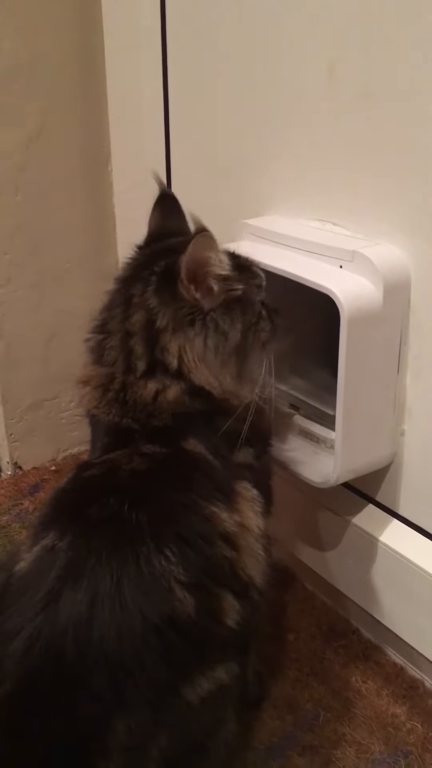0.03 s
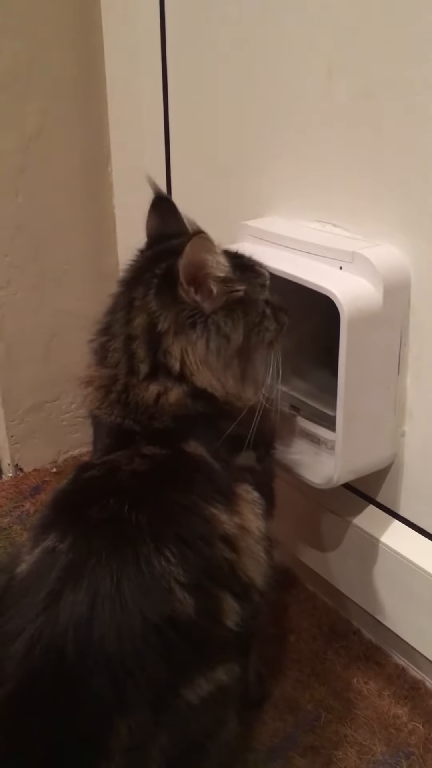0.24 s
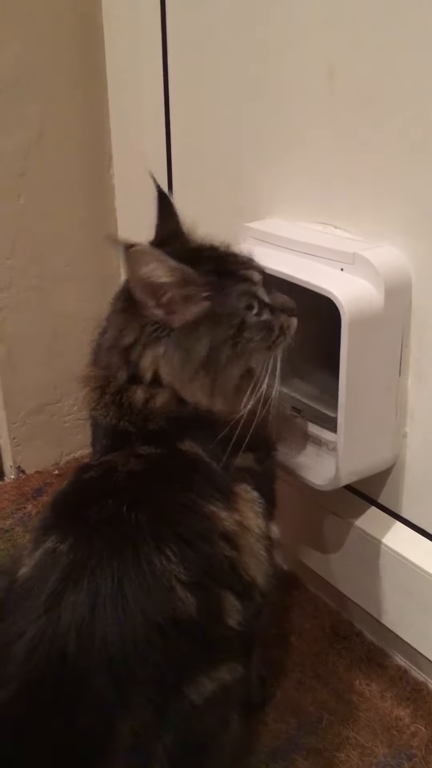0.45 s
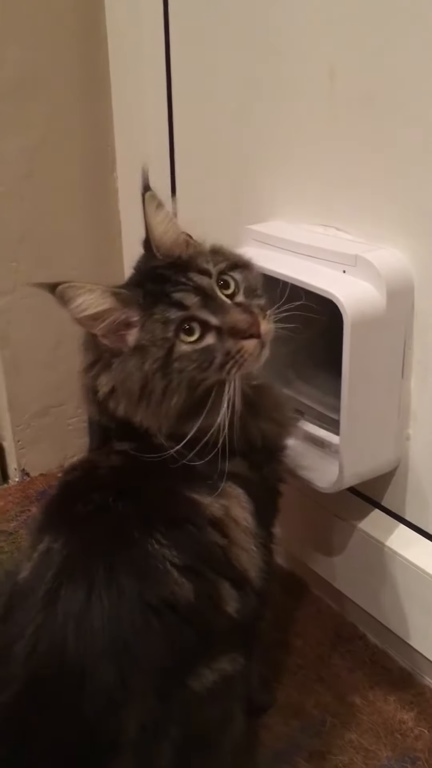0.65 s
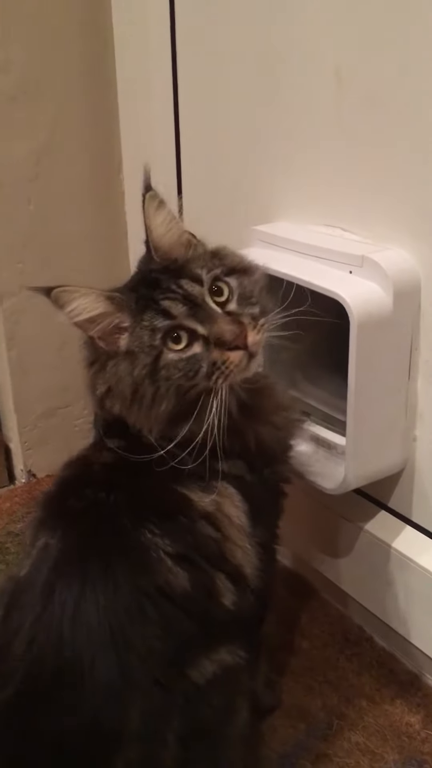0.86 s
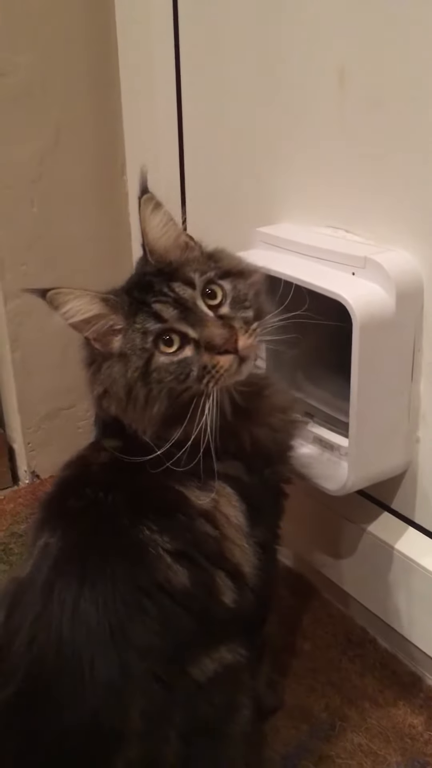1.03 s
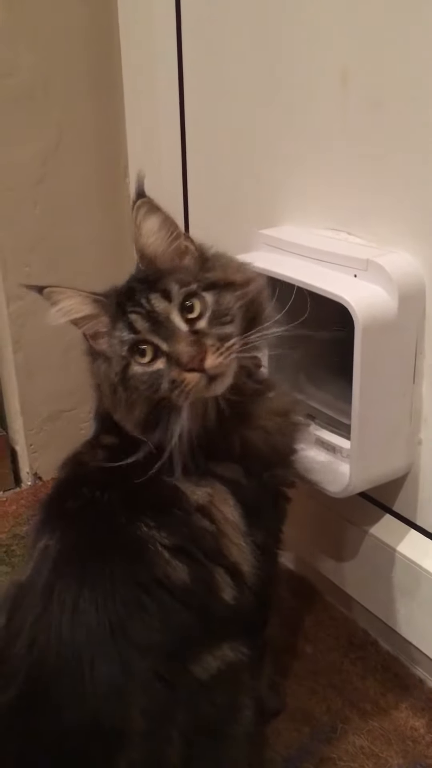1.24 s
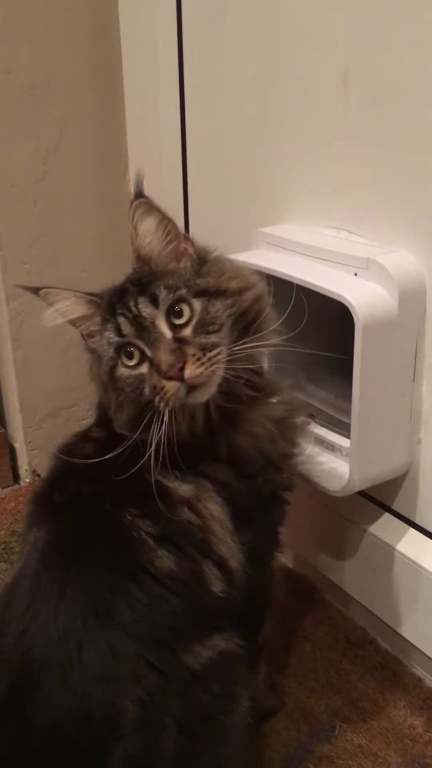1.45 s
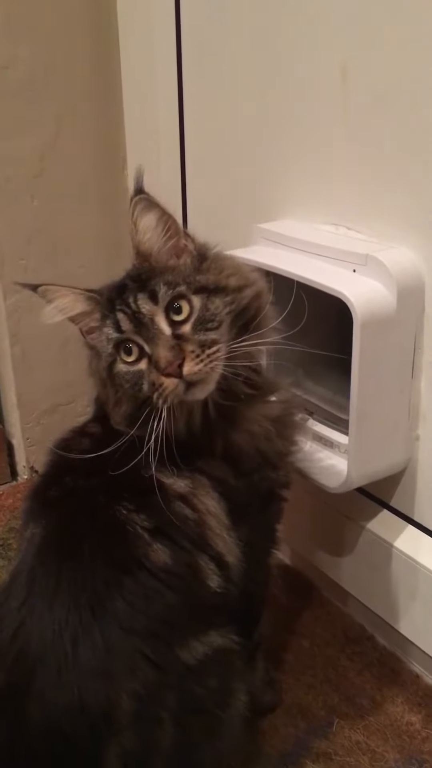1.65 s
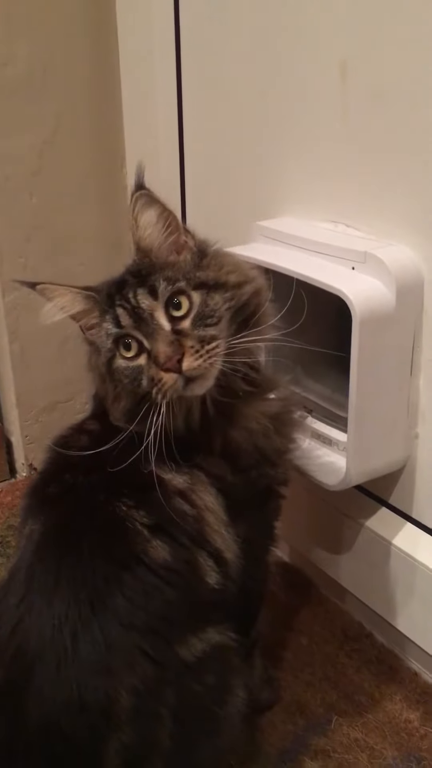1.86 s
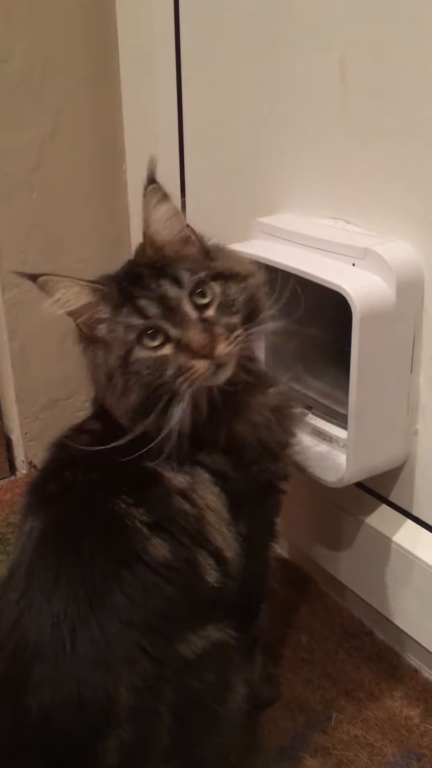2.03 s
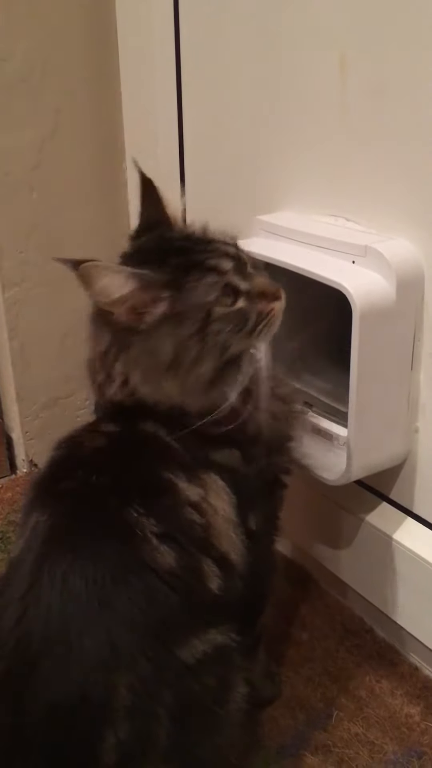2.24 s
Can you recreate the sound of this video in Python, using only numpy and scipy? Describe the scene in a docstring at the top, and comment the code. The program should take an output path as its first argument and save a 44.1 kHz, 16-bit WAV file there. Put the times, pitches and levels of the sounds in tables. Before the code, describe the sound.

A plastic cat flap ticks faintly, then clacks loudly against its frame at 0.2 seconds with a low thud from the door, rattling on until 0.7 seconds. In the lull, fur rubs very softly on the frame. From 1.6 seconds the flap ticks and rattles again, knocks at 2.1 seconds and taps lightly near 2.4. Each knock rings briefly in the small, quiet room.

```python
"""A small quiet room, one microphone near a door where a cat nudges a plastic cat flap.
After a few faint ticks the flap slams against its frame at 0.2 s, shaking the door panel, and rattles
until 0.7 s. In the lull fur rubs softly on the frame. From 1.6 s the flap ticks and rattles again,
knocks at 2.1 s and taps once more. Each knock is a quick chatter of plastic edges that rings the
housing; the room answers briefly."""
import sys
import numpy as np
from scipy import signal
from scipy.fft import rfft, irfft
from scipy.io import wavfile
from scipy.ndimage import uniform_filter1d

SR = 44100
rng = np.random.default_rng(int(sys.argv[2]) if len(sys.argv) > 2 else 0)


def dump_mix(stems):
    """Bounce the given channels to the path in sys.argv[1] as a 16-bit WAV at rate SR."""
    frames = np.atleast_2d(stems).T  # one column per channel
    limited = np.clip(frames, -1, 1)  # hard clip at full scale
    pcm = np.round(limited * 32767).astype(np.int16)
    wavfile.write(sys.argv[1], SR, pcm)


N = 105840  # 2.4 s

# spectra of room tone, rubbing fur and the fine rustle of whiskers and coat: f/Hz, relative level/dB
ROOM_TONE_SPECTRUM = [(20, -29), (45, 0), (70, -2.5), (110, 4), (170, -10), (320, -10), (480, -18.5),
                      (800, -17), (1400, -21), (2500, -32), (5000, -32), (9000, -33.5), (11000, -36.5),
                      (15800, -38.5)]
FUR_SPECTRUM = [(100, -5), (350, -4.5), (900, -2.5), (1800, -9), (3200, -16), (9000, -39), (16000, -53)]
RUSTLE_SPECTRUM = [(500, -6), (2000, 11.5), (4000, 7.5), (8000, 2.5), (16000, -17)]
# swells of rubbing and of rustle: t/s, half length/s, level/dB
FUR_SWELLS = [(0.001, 0.018, -62.5), (0.14, 0.052, -65), (0.52, 0.11, -63), (1.025, 0.08, -64),
              (1.202, 0.019, -65)]
RUSTLE_SWELLS = [(1.479, 0.048, -73.5), (1.681, 0.025, -65.5), (1.835, 0.019, -48.5), (1.985, 0.17, -68.5),
                 (2.24, .008, -67)]
# decay of the room: f/Hz, t60/s
ROOM_DECAY = [(150, 0.45), (500, 0.51), (1400, 0.39), (3700, 0.36), (9500, 0.26), (15000, 0.27)]
# modes of the door panel: f/Hz, relative level/dB, t60/s
DOOR_MODES = [(44, -16, 0.3), (66.5, -6, 0.34), (98.1, -4, 0.28), (107.7, -0.5, 0.25), (143.6, 2, 0.29),
              (223.9, -4.5, 0.26), (237, -7, 0.23), (267, -12.5, 0.22), (350.7, -1.5, 0.25),
              (394, -1.5, 0.13), (583.5, -7.5, 0.32)]
# blows that reach the panel: t/s, swell/s, gain/dB, most excited f/Hz
DOOR_BLOWS = [(0.013, 0.019, -45, 204), (.105, 0.023, -49.5, 107), (.209, 0.008, -21.5, 73),
              (.214, 0.01, -32.5, 433), (0.2375, 0.0027, -26, 153.5), (0.3, 0.004, -43, 75),
              (0.318, 0.0016, -39, 70), (.452, 0.0074, -43.5, 74.6), (0.518, 0.027, -48.5, 100),
              (0.643, 0.0061, -42, 151), (0.689, 0.018, -33, 213), (1.740, 0.0099, -41, 373),
              (1.828, 0.014, -40, 600), (1.838, 0.005, -49.5, 149), (2.12, 0.012, -41.5, 104.4),
              (2.383, 0.013, -42, 82)]
# colour of the plastic housing: f/Hz, gain/dB
HOUSING_COLOUR = [(60, 6.5), (170, 3), (240, 22), (370, 21), (490, 13.5), (650, 18.5), (1100, 13),
                  (1250, 13.5), (1470, 14), (1640, 11), (1820, 13), (2020, 13), (2400, 12), (3000, 6.5),
                  (4200, 6), (6000, 5.5), (7700, 2.5), (9100, 9), (10600, 0.5), (12300, 6), (14000, -5),
                  (15800, -9)]
# modes of the housing: f/Hz, relative level/dB, t60/s
HOUSING_MODES = [(327.6, -4, 0.4), (897, -6.5, 0.24), (1070, -4.5, 0.15), (1436, -25, 0.2),
                 (1742, -9, 0.17), (1842, -3, 0.14), (2257, -7.5, 0.13), (2689, -11, 0.12),
                 (2862, -9, 0.17), (3273, -10.5, 0.14), (3700, -8.5, 0.17), (4160, -13.5, .22),
                 (5644, -9, 0.11), (5990, -23, 0.17), (8860, -9, 0.14), (11604, -18, 0.18)]
# the six bands of a knock, low to treble: f/Hz
KNOCK_BANDS_HZ = [300, 850, 1650, 2500, 4200, 10000]
# flap against frame: t/s, time to seat/s, gain/dB in each of the six bands, ringing gain/dB
FLAP_KNOCKS = [ (0.026, 0.007, -70, -71, -55, -64.5, -51.5, -59, -14),
               (0.044, 0.0054, -56.5, -78, -62, -59, -51, -50, -1.5),
               (0.128, 0.0064, -54, -68, -68, -60, -65, -84, -11),
               (.2, .002, -51, -45, -34, -49, -42, -51, -14),
               (.202, 0.0075, -47.5, -38, -25.5, -26.5, -25.5, -30.5, 0.5),
               (.22, 0.0069, -36, -41.5, -35.5, -33, -39, -39.5, -6.5),
               (0.234, 0.0056, -46, -44.5, -46, -38, -31, -57, -7),
               (.443, 0.0055, -59.5, -64, -57, -62, -71, -84, -8),
               (0.463, 0.0081, -83, -63, -51, -59.5, -56.5, -67, -6),
               (0.493, 0.0072, -59, -51.5, -47, -48.5, -54.5, -65, -8.5),
               (.603, 0.013, -53.5, -52.5, -50, -57, -65, -92, -10),
               (.638, 0.0068, -50, -48, -38, -45.5, -44.5, -61.5, -5),
               (.653, 0.0026, -46.5, -49.5, -40.5, -44.5, -58, -80, -10),
               (0.673, 0.014, -44.5, -47.5, -43, -47, -50.5, -71.5, -6),
               (1.569, 0.0083, -80, -59, -49.5, -53, -71, -78, -20),
               (1.595, 0.0097, -91, -63, -60, -63, -74, -81, -14),
               (1.648, 0.0056, -87, -57.5, -53, -55.5, -70, -74, -10),
               (1.732, 0.013, -63, -48, -41.5, -47, -47, -63, -3.5),
               (1.752, 0.01, -52, -53, -49, -48, -53, -70, -15),
               (1.8, 0.0087, -84, -55, -49, -38.5, -42, -44, -15),
               (1.824, .009, -52, -48, -41.5, -42.5, -41.5, -59, -25),
               (1.867, 0.01, -52, -51.5, -51, -48.5, -50, -60.5, 0.5),
               (2.1147, 0.0061, -47.5, -33.5, -33.5, -42.5, -37.5, -53, -5.5),
               (2.139, 0.0016, -39.5, -40.5, -45, -55, -43, -69, -17),
               (2.384, 0.0055, -53, -59, -59, -63, -76, -85, -4)]

ROOM_TONE_DB, REVERB_DB, REVERB_BUILD_S = -59.5, -4, 0.0051
CHATTER_DECAY_S, CONTACTS_PER_S, CONTACT_SPREAD_DB = 0.01, 16000, 1.5
RING_SPREAD_DB, THUD_WIDTH_OCT = 3.2, 0.42
LOW_CUT_HZ, TOP_HZ = 23, 15800


def amp(db):
    """Decibels to gain."""
    return 10 ** (np.asarray(db) / 20)


def curve_at(points, hz):
    """Reads a table on a log-frequency axis."""
    f, value = np.transpose(points)
    return np.interp(np.log(hz + 1), np.log(f + 1), value)


def unit_rms(x):
    """Scales to rms 1."""
    return x / np.sqrt(np.mean(x ** 2) + 1e-20)


def add(mix, start_s, sound):
    """Mixes a sound in at its start time."""
    part = mix[max(round(start_s * SR), 0):][:len(sound)]
    part += sound[:len(part)]


def colour(x, *curves, size=4096):
    """Minimum-phase filter from the sum of dB curves."""
    hz = abs(np.fft.fftfreq(size, 1 / SR))
    log_gain = np.log(amp(sum(curve_at(curve, hz) for curve in curves)))
    taps = np.fft.ifft(np.exp(np.conj(signal.hilbert(log_gain)))).real[:size // 2]
    return signal.fftconvolve(x, taps)[:len(x)]


def flatten(x, width_hz=260):
    """Levels the chance humps in a burst's spectrum."""
    hz = np.fft.rfftfreq(len(x), 1 / SR)
    power = uniform_filter1d(abs(rfft(x)) ** 2, int(width_hz / hz[1]))
    return colour(x, np.c_[hz, -10 * np.log10(power / power.mean())])


def noise(spectrum):
    """Steady noise of a given spectrum, rms 1."""
    gain = amp(curve_at(spectrum, np.fft.rfftfreq(N, 1 / SR)))
    return unit_rms(irfft(rfft(rng.standard_normal(N)) * gain, N))


def room_tone():
    """The quiet room at the microphone: a steady low rumble with faint hiss."""
    return amp(ROOM_TONE_DB) * noise(ROOM_TONE_SPECTRUM)


def room_reverb(x):
    """Near walls add a dense tail of reflections whose treble dies first."""
    hz, t, spectra = signal.stft(rng.choice([-1., 1.], SR), SR, nperseg=256)
    decay = amp(-60 * t / curve_at(ROOM_DECAY, hz)[:, None])
    tail = signal.istft(spectra * decay, SR, nperseg=256)[1]
    tail *= 1 - np.exp(-(np.arange(len(tail)) / SR / REVERB_BUILD_S) ** 2)
    return x + amp(REVERB_DB) * signal.fftconvolve(x, tail / np.linalg.norm(tail))[:len(x)]


def cat_rubbing(spectrum, swells):
    """Friction noise swells and fades as the cat shifts against the frame."""
    t = np.arange(N) / SR
    envelope = sum(amp(db) * np.exp(-.5 * ((t - peak_s) / half_s) ** 2) for peak_s, half_s, db in swells)
    return noise(spectrum) * envelope


def door_thud(swell_s, gain_db, centre_hz):
    """The door panel swings up and booms in the modes near the pitch of the blow."""
    t = np.arange(SR) / SR
    boom = np.zeros(len(t))
    for hz, db, t60 in DOOR_MODES:
        excitation = np.exp(-.5 * (np.log2(hz / centre_hz) / THUD_WIDTH_OCT) ** 2)
        boom += excitation * amp(db - 60 * t / t60) * np.sin(2 * np.pi * hz * t)
    return amp(gain_db) * np.minimum(t / swell_s, 1) * boom


def housing_ring(t, blow_spectrum):
    """The plastic housing rings on; each blow weights its modes a little differently."""
    ring = np.zeros(len(t))
    for hz, db, t60 in HOUSING_MODES:
        mode_db = db + curve_at(blow_spectrum, hz) + RING_SPREAD_DB * rng.standard_normal()
        ring += amp(mode_db - 60 * t / t60) * np.sin(2 * np.pi * (hz * t + rng.random()))
    return ring


def edge_chatter(force):
    """Plastic edges meet in a dense run of tiny random contacts that follow the force."""
    count = len(force)
    contacts = rng.choice([-1., 1.], count) * amp(CONTACT_SPREAD_DB * rng.standard_normal(count))
    touching = rng.random(count) < CONTACTS_PER_S / SR
    return unit_rms(contacts * touching * force) * np.sqrt(np.mean(force ** 2))


def flap_knock(seat_s, band_db, ring_db):
    """Chatter swells as the flap seats in its frame, then dies away; housing and room ring on."""
    t = np.arange(SR * 3 // 4) / SR
    top_db = band_db[-1] + .35 * (band_db[-1] - band_db[-2])  # a dull knock keeps falling above the treble
    blow_spectrum = [*zip(KNOCK_BANDS_HZ, band_db), (TOP_HZ, top_db)]
    seating = np.minimum(t / seat_s, 1) ** 1.3
    force = seating * np.exp(-np.maximum(t - seat_s, 0) / CHATTER_DECAY_S)
    chatter = edge_chatter(force)
    ring = amp(ring_db) * seating * housing_ring(t, blow_spectrum)
    burst = flatten(room_reverb(chatter))
    return colour(burst, HOUSING_COLOUR, blow_spectrum) + ring


def scene():
    """Room tone and the cat's rubbing behind the knocks of the flap and thuds of the door, in mono."""
    mix = room_tone()
    mix += cat_rubbing(FUR_SPECTRUM, FUR_SWELLS)
    mix += cat_rubbing(RUSTLE_SPECTRUM, RUSTLE_SWELLS)
    for start_s, seat_s, *band_db, ring_db in FLAP_KNOCKS:
        add(mix, start_s, flap_knock(seat_s, band_db, ring_db))
    for start_s, *blow in DOOR_BLOWS:
        add(mix, start_s, door_thud(*blow))
    return mix[None]


def record(dry):
    """The microphone's low cut and the recorder's band limit."""
    low_cut = signal.butter(2, LOW_CUT_HZ, "highpass", fs=SR, output="sos")
    band_limit = signal.firwin(511, TOP_HZ, window=("kaiser", 9), fs=SR)
    return signal.oaconvolve(signal.sosfilt(low_cut, dry), band_limit[None], "same")


dry = scene()
out = record(dry)
dump_mix(out)
```